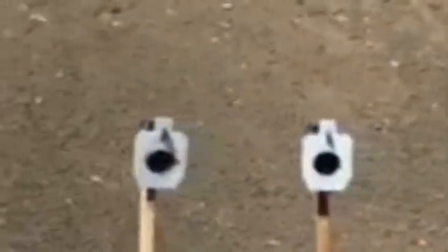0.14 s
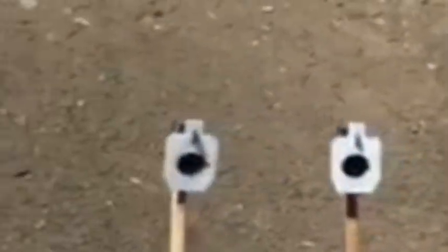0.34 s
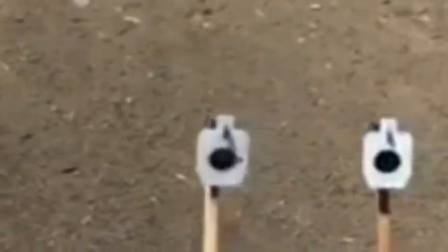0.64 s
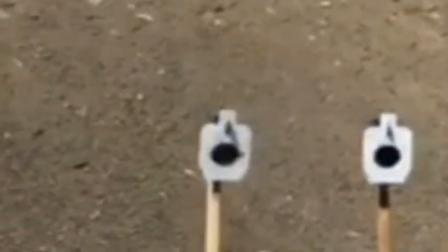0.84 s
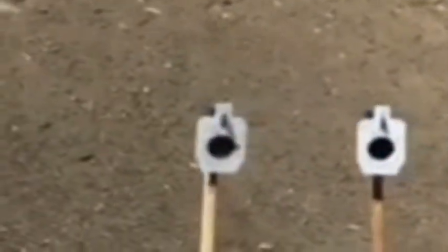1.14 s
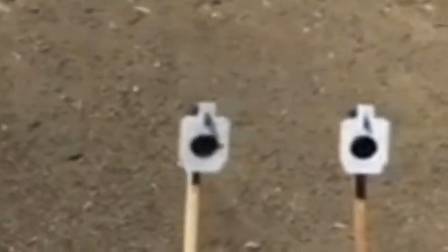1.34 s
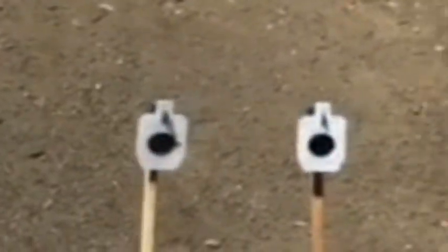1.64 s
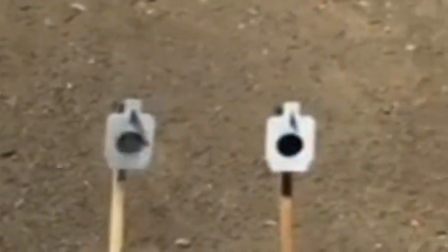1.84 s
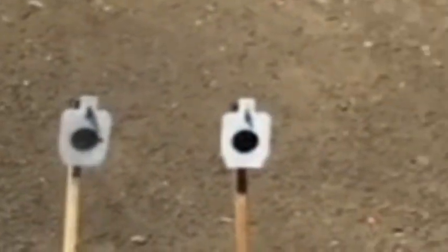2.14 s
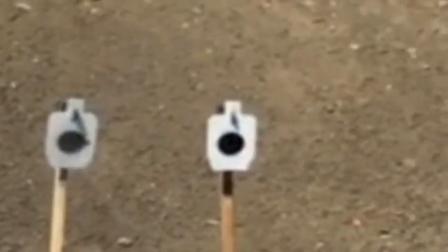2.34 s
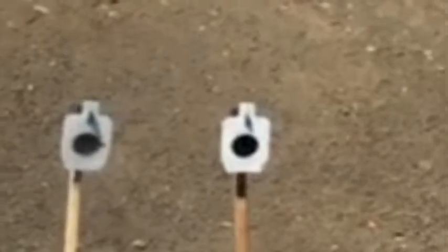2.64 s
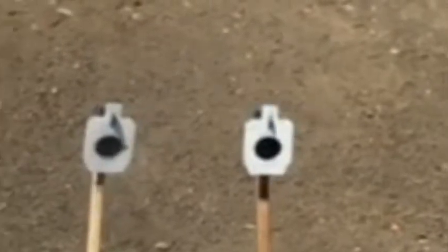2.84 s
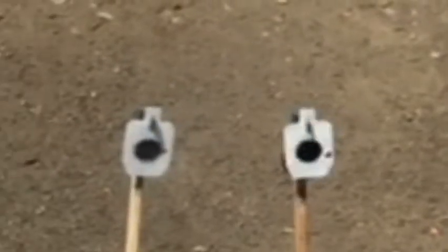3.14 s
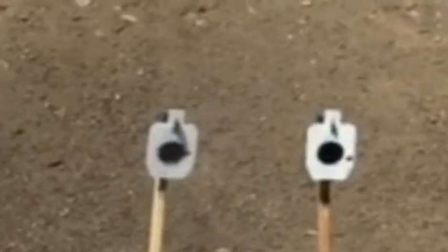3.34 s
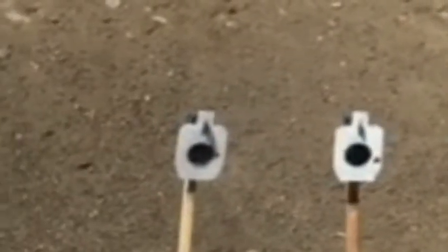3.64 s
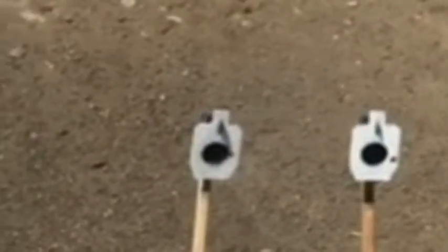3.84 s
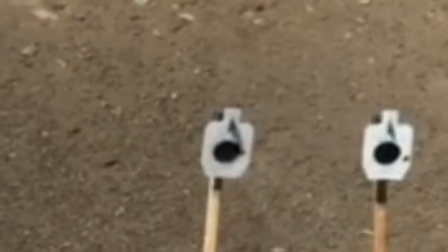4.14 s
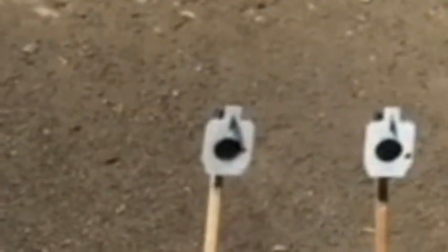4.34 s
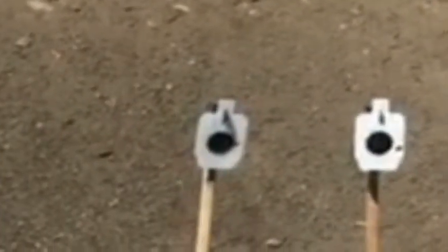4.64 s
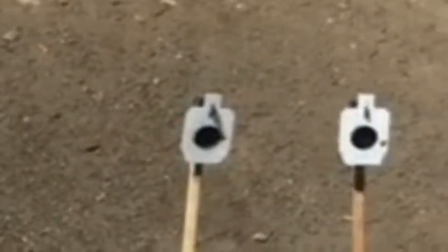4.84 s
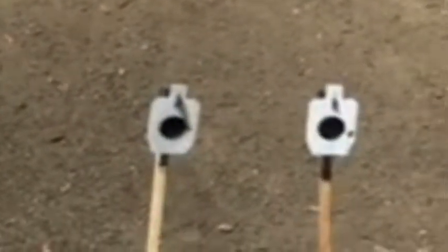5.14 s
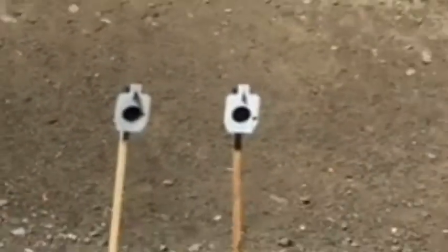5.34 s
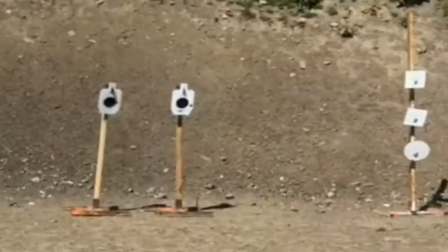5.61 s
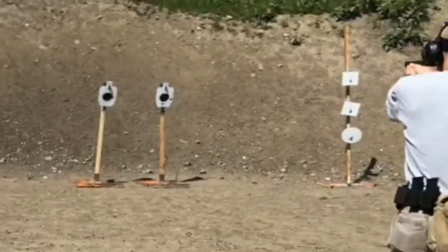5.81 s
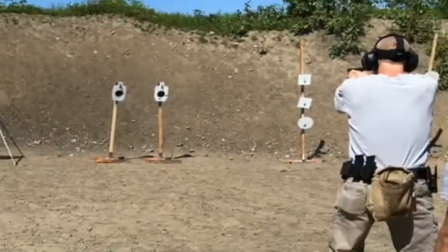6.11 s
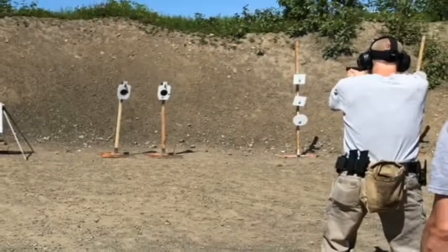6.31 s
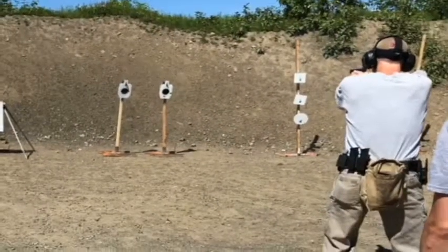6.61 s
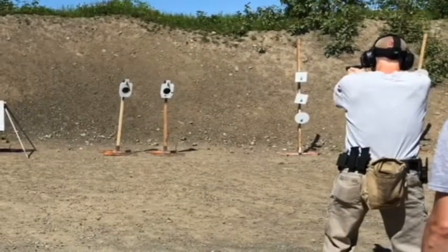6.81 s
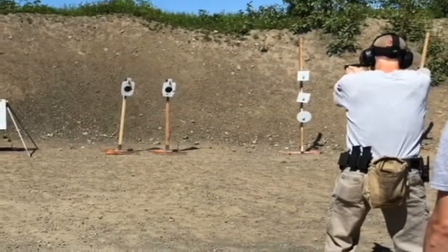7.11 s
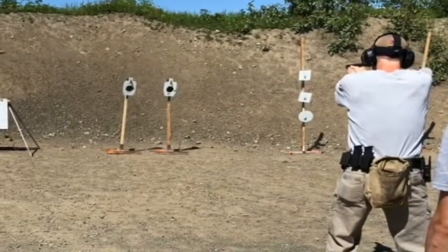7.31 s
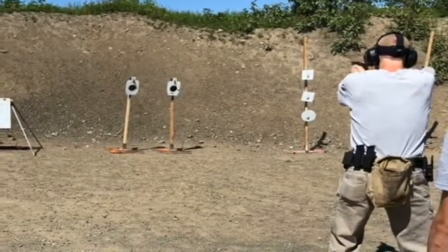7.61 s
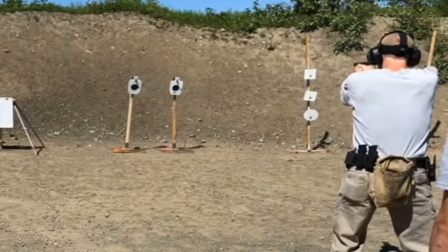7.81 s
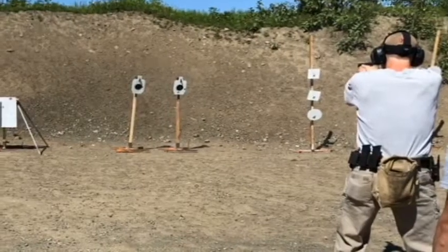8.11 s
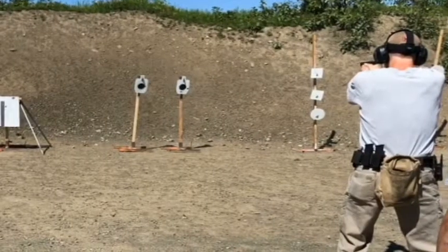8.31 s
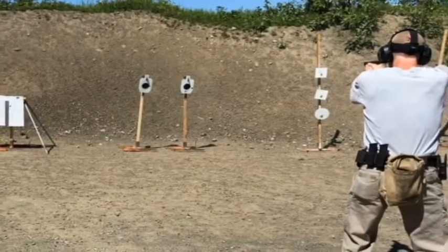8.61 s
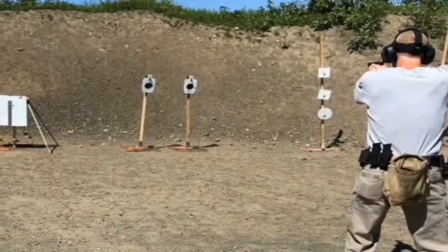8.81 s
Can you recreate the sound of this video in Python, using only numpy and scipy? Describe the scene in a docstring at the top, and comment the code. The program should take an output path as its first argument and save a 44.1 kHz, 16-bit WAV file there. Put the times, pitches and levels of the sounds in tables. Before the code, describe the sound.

Six spaced pistol shots, heard from just behind the shooter in an earth-walled outdoor bay. Each hard, clipped blast has a low boom and short echo, then a bullet smack and a bright steel ring swelling up as the microphone recovers. Feet crunch gravel, cases tinkle faintly, plates knock on their hangers, and a ricochet whirrs downward after the final shot.

```python
"""Pistol shots at steel plates

Six shots at two hanging plates in an earth-walled bay, heard from just behind the shooter. Each blast is shaped
noise plus a falling boom, bounced off the earth walls (berms), and it overloads the microphone. The bullet's
smack and the plate's ring, a sum of fading sines, come back about 50 ms later and swell as the limiter lets go.
Plates knock on their hangers, feet grind on gravel (lumpy noise), spent cases tinkle (pairs of high sines),
and after the last shot a fragment whirrs off as a falling tone with hiss, over quiet air and a faint hum."""
import sys
import numpy as np
from scipy import signal
from scipy.fft import rfft, irfft
from scipy.io import wavfile

SR = 44100
rng = np.random.default_rng(int(sys.argv[2]) if len(sys.argv) > 2 else 0)


def generate_wav(sig):
    """Save sig (samples, or channels by samples) to the path in sys.argv[1] as 16-bit PCM at SR."""
    pcm = np.round(np.clip(np.atleast_2d(sig).T, -1, 1) * 32767).astype(np.int16)
    wavfile.write(sys.argv[1], SR, pcm)


N = 395136
T = np.arange(N) / SR  # time in the scene, s
AGE = T[:49152]  # time since one sound began, s


def undb(db):
    """Turn decibels into a gain."""
    return 10 ** (np.asarray(db) / 20)


def add(out, t, x):
    """Mix x into out from time t (s) on."""
    i = int(round(max(t, 0) * SR))
    out[i:i + len(x)] += x[:max(N - i, 0)]


def noise(points, size=len(AGE)):
    """Noise of rms 1, its spectrum drawn through (f/Hz, relative level/dB) points."""
    hz, db = np.transpose(points)
    f = np.maximum(np.fft.rfftfreq(size, 1 / SR), 1)
    gain = undb(np.interp(np.log(f), np.log(hz), db)) * (f > hz[0] / 2)
    x = irfft(rfft(rng.standard_normal(size)) * gain, size)
    return x / x.std()


def fade(rise, t60):
    """A quick rise (s), then an exponential fall that loses 60 dB in t60 (s)."""
    return (1 - np.exp(-AGE / rise)) * np.exp(-np.log(1000) * AGE / t60)


def dull(x, hz):
    """Gently lose treble above hz."""
    return signal.sosfilt(signal.butter(1, min(hz, .45 * SR), fs=SR, output="sos"), x)


def grains(spread_db, step):
    """A gain of rms 1 that moves to a new random value every step seconds."""
    knots = np.arange(0, AGE[-1], step)
    jumps = np.clip(rng.standard_normal(len(knots)), -2, 2)
    gain = undb(spread_db * np.interp(AGE, knots, jumps))
    return gain / np.sqrt(np.mean(gain ** 2))


def lumpy(x, spread_db=4.0):
    """Make noise come in lumps, as when stones and clods throw it back."""
    return x * grains(spread_db, step=.004)


# The colour of the outdoor air: f/Hz, relative level/dB
AIR_COLOUR = [(15, -43), (25, -18), (92, -7), (236, -13), (270, -3.5), (301, -11), (911, -14),
              (1230, -15.5), (1480, -19.5), (1610, -18.5), (2840, -26), (16000, -38.5)]
# How loud the air is over time: t/s, level/dB
AIR_LEVEL = [(0, -70), (1.4, -64), (2.8, -71.5), (4, -70.5), (5.4, -69), (6.25, -73), (6.6, -72),
             (7.4, -66), (8.3, -72), (8.96, -67)]


def background(hum_hz=266.7, hum_db=-71):
    """Quiet outdoor air is shaped noise; a faint hum is a sine wavering in pitch and level."""
    air = undb(np.interp(T, *np.transpose(AIR_LEVEL))) * noise(AIR_COLOUR, size=N)
    knots = np.linspace(0, T[-1], num=30)
    waver = np.interp(T, knots, rng.standard_normal(len(knots)))  # used both as Hz and as dB
    hum = np.sin(2 * np.pi * np.cumsum(hum_hz + waver) / SR)
    return air + undb(hum_db + waver) * hum


def grit(hz):
    """Stones grinding together: noise that is strongest around hz."""
    return noise([(hz / 8, -16), (hz / 2, -4), (hz, 0), (hz * 2, -9),
                  (hz * 4, -18), (hz * 12, -36), (hz * 40, -60)])


# Feet shift on the gravel: t/s, length/s, level/dB, centre f/Hz
SHUFFLES = [(0, .29, -60.5, 1700), (.96, .24, -66, 1900), (1.25, .32, -61, 2110), (2.52, .18, -54.5, 1047),
            (5.27, .09, -58.5, 750), (6.666, .2, -61, 1250), (8.56, .39, -66.5, 1100)]


def shuffling(grain_db=4, grind_db=-11, slips_per_s=33, slip_t60=0.036, slip_spread_db=8):
    """A shifting sole grinds on, and stones slip under it at uneven intervals."""
    out = np.zeros(N)
    for t, length, db, hz in SHUFFLES:
        shape = np.zeros(N)
        add(shape, 0, undb(grind_db) * (AGE < length))
        for k, (late, size) in enumerate(rng.random((32, 2))):
            when = (k + late) / slips_per_s
            if when < length:
                add(shape, when, undb(slip_spread_db * size) * fade(.0002, slip_t60))
        shape = shape[:len(AGE)] * grains(grain_db, step=.002)
        shape /= np.sqrt(np.sum(shape ** 2) / (length * SR))  # even out the loudness
        add(out, t, undb(db) * grit(hz) * shape)
    return out


# The loudest crunches of gravel underfoot: t/s, level/dB, t60/s, centre f/Hz
SCUFFS = [(0.073, -53, 0.15, 1110), (.14, -49, 0.2, 1720), (0.942, -46.5, 0.22, 1100),
          (1.205, -47, 0.046, 2350), (1.222, -38.5, 0.066, 1890), (1.59, -41, 0.44, 2020),
          (1.603, -35.5, 0.12, 1900), (2.229, -58.5, 0.42, 288), (2.335, -55, 0.12, 1520),
          (3.827, -41.5, 0.033, 415), (6.397, -55.5, 0.042, 1090), (6.936, -58.5, .12, 1400)]


def gravel(grain_db=5, tick_db=1):
    """Short gritty crunches: one stone clicks along with a cluster of uneven grains."""
    out = np.zeros(N)
    for t, db, t60, hz in SCUFFS:
        cluster = grains(grain_db, step=.002) * fade(0.0011, t60)
        click = undb(tick_db) * fade(0.00049, 0.013)
        add(out, t, undb(db) * grit(hz) * (cluster + click))
    return out


# The colour of a hard hit: f/Hz, relative level/dB
SMACK_COLOUR = [(100, -16), (500, -1), (1400, 2.5), (3500, -2.5), (7000, -8.5), (16000, -13.5)]


def smack_noise():
    """Hard hits share this noise: bullet smack and spray, case clicks; so does the faint hiss before a shot."""
    return noise(SMACK_COLOUR)


# A spent case lands and tinkles: t/s, level/dB, f/Hz, length of its hop/s
CASES = [(0.0236, -52.5, 11470, .228), (1.218, -50, 11000, .18), (1.4783, -47.5, 10670, 0.14),
         (2.5531, -56, 11570, .1), (4.1934, -55, 11460, .1), (5.0683, -48.5, 11720, 0.11),
         (6.586, -57, 11450, 0.064), (8.4057, -56.5, 11700, .11)]


def brass(t60=0.7, split_hz=70, click_db=0, full_hop_s=0.14, hop_db=-8):
    """A case rings in a close pair of high modes, on landing and again after one hop."""
    out = np.zeros(N)
    for t, db, hz, hop in CASES:
        pair = np.sin(2 * np.pi * hz * AGE) + .5 * np.sin(2 * np.pi * (hz + split_hz) * AGE)
        ring = pair * (fade(0.00013, t60) / 2 + fade(0.0001, t60 / 10))
        click = undb(click_db) * smack_noise() * fade(0.000099, 0.02)
        tinkle = undb(db) * (ring + click) / 2
        add(out, t, tinkle)
        add(out, t + hop, undb(hop_db) * hop / full_hop_s * tinkle)  # shorter hops land softer
    return out


# A tumbling fragment flies off: t/s, spin f/Hz, whirr level/dB, hiss level/dB
RICOCHET = [(7.85, 632, -90, -68), (7.905, 504, -74, -41), (7.93, 368.5, -33.5, -43),
            (7.957, 256, -31, -50), (7.981, 160, -48.5, -46.5), (8.03, 87.4, -53, -53),
            (8.12, 58.4, -82, -76)]


def ricochet(second_db=-17, echo_s=.07, echo_db=-20, flutter_db=3, flutter_s=0.014):
    """The spin sets a falling, fluttering whirr with hiss; a berm echoes the whirr."""
    s, spin_hz, whirr_db, hiss_db = np.transpose(RICOCHET)
    phase = 2 * np.pi * np.cumsum(np.interp(T, s, spin_hz)) / SR
    flying = (T > s[0]) & (T < s[-1])
    flutter = np.interp(T - s[0], AGE, grains(flutter_db, flutter_s))
    tone = np.sin(phase) + undb(second_db) * np.sin(2 * phase)
    whirr = flying * flutter * undb(np.interp(T, s, whirr_db)) * tone
    rush = noise([(200, -11), (700, 4.0), (2000, 0), (7000, -1.0), (15000, -8.0)], size=N)
    out = whirr + flying * undb(np.interp(T, s, hiss_db)) * rush
    add(out, echo_s, undb(echo_db) * whirr)
    return out


def partials(hz, db, t60, swing_s=0.98, lobes=2.2, depth=0.66, rub_s=0.9):
    """Modes of a swinging plate: their lobes sweep past the microphone, so each blooms and dips."""
    hz, db, t60 = (np.float32(v)[:, None] for v in (hz, db, t60))
    start, turn = np.float32(2 * np.pi * rng.random((len(hz), 2))).T[:, :, None]
    age = np.float32(AGE)
    slow = age[::64]  # the slow changes need only one value per 64 samples
    swing = np.sin(2 * np.pi * slow / swing_s)
    beam = 1 + depth * np.cos(lobes * np.sqrt(hz / 1000) * swing + turn)
    early = slow < swing_s / 4
    beam /= np.sqrt(np.mean(beam[:, early] ** 2, axis=1, keepdims=True))
    rubbing = np.exp(-(slow / rub_s) ** 2)  # the hanger damps the plate more as it settles
    size = np.float32(undb(db) * beam * rubbing * np.exp(-np.log(1000) * slow / t60))
    return np.sum(np.repeat(size, 64, axis=1) * np.sin(2 * np.pi * hz * age + start), axis=0)


def plate(modes, minor_db, minor_t60=0.48, count=30):
    """One ring for each point of impact: the strong modes over a crowd of weak ones."""
    hz, t60, *points = np.transpose(modes)
    minor_hz = 2000 + 13700 * (np.arange(count) + rng.random(count)) / count
    rings = []
    for db in points:
        weak_db = minor_db + 4 * rng.standard_normal(count)
        weak = partials(minor_hz, weak_db, np.full(count, minor_t60))
        rings.append(partials(hz, db, t60) + weak)
    return rings


# Modes of the left plate, struck by shots 1-2: f/Hz, t60/s, level/dB at each of two points of impact
LEFT_PLATE = [(1621, 0.6, -34, -40), (2805, 1.3, -29, -37), (3077, 0.56, -18, -17), (3470, 1.2, -51, -43),
              (3850, 0.7, -42, -34), (4284, 0.64, -17, -17), (4805, 0.75, -27, -28), (5884, 0.64, -18, -34),
              (6309, 0.85, -32, -36), (7199, 0.35, -20, -34), (8011, 0.45, -25, -40),
              (8352, 0.93, -15, -14), (8482, 0.49, -16, -27), (8583, 0.47, -12, -18),
              (8940, 0.52, -26, -32), (9296, 0.68, -28, -38), (10102, 0.6, -22, -34),
              (10401, 0.7, -36, -30), (11282, 0.56, -32, -29), (11901, 0.48, -33, -33),
              (13719, 0.51, -14, -26), (13757, 0.8, -27, -31), (14853, 0.64, -30, -39)]
# Modes of the right plate, struck by shots 3-6: f/Hz, t60/s, level/dB at each of four points of impact
RIGHT_PLATE = [(1061, 0.95, -39, -44, -43, -43), (1480, 0.8, -31, -34, -21, -27),
               (1505, 0.65, -20, -19, -23, -20), (1597, 0.83, -44, -48, -23, -39),
               (1845, 0.73, -29, -44, -30, -37), (2035, 0.51, -32, -21, -24, -23),
               (2318, 0.85, -22, -39, -25, -43), (2657, 0.8, -38, -47, -27, -39),
               (2922, 0.64, -30, -35, -23, -22), (3254, 0.56, -38, -33, -16, -29),
               (3607, 0.67, -26, -29, -27, -40), (3811, 0.59, -34, -22, -28, -16),
               (3969, 0.74, -24, -20, -41, -21), (4515, 0.66, -38, -47, -18, -34),
               (4704, 0.57, -26, -20, -26, -14), (5138, 0.5, -13, -38, -28, -30),
               (5948, 0.66, -37, -50, -19, -29), (6267, 0.63, -28, -18, -36, -33),
               (6362, 0.57, -23, -19, -31, -19), (6632, 0.38, -30, -17, -22, -26),
               (6703, 0.68, -29, -10, -44, -26), (6774, 0.51, -32, -36, -27, -21),
               (7257, 0.79, -32, -19, -34, -24), (7568, 0.45, -37, -38, -16, -43),
               (8015, 0.56, -24, -50, -26, -35), (8411, 0.48, -37, -37, -20, -39),
               (8682, 0.65, -28, -29, -34, -30), (9502, 0.6, -25, -21, -36, -15),
               (9588, 0.62, -25, -13, -36, -11), (9879, 0.45, -13, -37, -28, -38),
               (10222, 0.38, -19, -50, -17, -15), (10615, 0.9, -37, -32, -31, -22),
               (10654, 0.39, -25, -37, -11, -27), (10738, 0.53, -29, -21, -29, -23),
               (11169, 0.52, -50, -50, -15, -34), (11271, 0.54, -30, -50, -17, -31),
               (12851, 0.44, -37, -23, -39, -23), (13041, 0.75, -33, -40, -28, -43),
               (13561, 0.32, -32, -43, -21, -20), (13662, 0.5, -34, -45, -23, -42),
               (14530, 0.44, -40, -16, -34, -34), (14560, 0.66, -43, -24, -35, -28),
               (15090, 0.51, -34, -31, -37, -27), (15453, 0.53, -39, -41, -22, -27),
               (15562, 0.5, -17, -43, -25, -30)]


def plate_rings():
    """Six rings, one per shot: where the bullet lands decides how strongly each mode sounds."""
    return plate(LEFT_PLATE, minor_db=-38) + plate(RIGHT_PLATE, minor_db=-29)


def wake(tone, low_hz=1600, high_hz=3300):
    """A soft knock wakes mostly the plate's middle modes."""
    band = signal.butter(1, [low_hz, high_hz], "band", fs=SR, output="sos")
    return signal.sosfilt(band, dull(tone, high_hz))


# A swinging plate knocks on its hanger: t/s, clatter level/dB, ring level/dB
KNOCKS = [(0.736, -44, -24), (2.088, -47.5, -30.5), (3.125, -28, -14.5), (3.488, -48, -40.5),
          (4.664, -40.5, -26.5), (5.128, -54.5, -41), (5.746, -34.5, -15.5), (6.028, -45.5, -41.5),
          (6.123, -51, -55), (7.688, -29, -16)]
# The colour of the hanger's clatter: f/Hz, relative level/dB
HANGER_COLOUR = [(200, -43), (600, -16), (900, 8), (1200, 8), (1550, 9), (2200, 0.5), (4000, -3),
                 (8000, -16), (16000, -11)]


def hanger_knocks(rings, knock_t60=0.216, wake_db=2):
    """Each knock is a lumpy clatter that softly rings the plate hit last; returns clatter and ringing."""
    clatter, steel = np.zeros(N), np.zeros(N)
    for t, db, ring_db in KNOCKS:
        last = sum(shot[0] < t for shot in SHOTS) - 1
        add(clatter, t, undb(db) * lumpy(noise(HANGER_COLOUR)) * fade(0.00041, knock_t60))
        add(steel, t, undb(ring_db + wake_db) * wake(rings[last]))
    return clatter, steel


# The colour of sound scattered by the ground and the bay: f/Hz, relative level/dB
SCATTER_COLOUR = [(50, -10), (250, -8), (800, -1), (2000, -8.5), (4000, -1.5), (8000, -8), (16000, -20.5)]


def scatter_noise():
    """Noise for sound thrown back from many places at once."""
    return noise(SCATTER_COLOUR)


def bay_echo(steel, echo_db=-13, echo_t60=0.15):
    """The bay smears the steel's sound into a short dense echo."""
    bay = scatter_noise() * fade(0.042, echo_t60)
    bay /= np.sqrt(np.sum(bay ** 2))
    return undb(echo_db) * signal.fftconvolve(steel, bay)[:N]


def lead_in(db=-16, t60=0.036, hiss_db=-38, hiss_t60=0.26):
    """A faint flat hiss under a dull swell (a fading noise reversed) that runs into the crack; 22 ms long."""
    size = int(.022 * SR)
    swell = noise([(100, -10.5), (450, 0.5), (800, -7.0), (1500, -18.5),
                   (3100, -19.5), (5000, -30.5), (16000, -64)])
    swell = (swell * fade(.0001, t60))[:size][::-1]
    hiss = (smack_noise() * fade(0.0001, hiss_t60))[:size]
    return undb(db) * swell + undb(hiss_db) * hiss


# Paths of the blast, direct and off ground and berms: delay/s, level/dB, rise/s, t60/s, treble corner f/Hz
PATHS = [(0, 8.5, .0002, .026, 14080), (.0034, 9.5, 0.00047, .02, 7880), (.023, 5, 0.0046, .04, 1200),
         (0.0291, 6, .001, .028, 2500), (.084, -15.5, .003, .06, 2500)]
# The colour of the blast: f/Hz, relative level/dB
BLAST_COLOUR = [(40, -12.5), (200, -5.5), (520, 4.5), (900, 2), (1800, -8.5), (3200, 1), (6000, -7),
                (11000, -7), (16000, -18.5)]
# The colour of the blast's far tail: f/Hz, relative level/dB
FAR_TAIL_COLOUR = [(40, -18.5), (120, -4), (260, -5), (500, -11.5), (1400, 0.5), (3500, 0), (7000, -9),
                   (16000, -24)]


def blast(berm_db, boom_db, boom_hz=54, glide_hz=60, return_db=-7,
          scatter_db=-11, scatter_t60=0.37, tail_db=-28, tail_t60=.7):
    """Muzzle blast: a few hard arrivals, a falling low boom, scatter from the gravel and a far tail."""
    out = np.zeros(N)
    for delay, db, rise, t60, corner_hz in PATHS:
        off_berm = delay > .01  # only the late paths take the berm's level
        arrival = dull(noise(BLAST_COLOUR), corner_hz) * fade(rise, t60)
        add(out, delay, undb(db + off_berm * berm_db) * arrival)
    phase = 2 * np.pi * np.cumsum(boom_hz + glide_hz * np.exp(-AGE / 0.012)) / SR
    boom = np.sin(phase) * fade(.025, 0.051)
    add(out, .008, undb(boom_db) * boom)
    add(out, .058, undb(return_db + boom_db) * boom)  # back from the end berm
    add(out, .004, undb(scatter_db) * lumpy(scatter_noise()) * fade(.006, scatter_t60))
    far_tail = lumpy(noise(FAR_TAIL_COLOUR), spread_db=3.5)
    add(out, .04, undb(tail_db) * far_tail * fade(0.031, tail_t60))
    return out[:len(AGE)]


# The shots: t/s, then level/dB of blast, berm echo, boom, smack and ring
SHOTS = [(0.3208, -2.5, -2.5, 9.5, -6.5, -0.5), (1.6729, -3, 2.5, 12, -6, -0.5), (2.9364, 0, 3, 9, -1, 1),
         (4.2835, -0.5, 1, 10.5, 1, 1.5), (5.524, 2, -2.5, 5, -2.5, 2), (7.535, 3.5, 0, 3.5, 1.5, 0.5)]


def shots(rings, round_trip_s=.0494, smack_db=5, smack_t60=0.013, spray_db=-23, spray_t60=0.33,
          bloom_s=0.051, bloom_share=0.6):
    """Blast, then the bullet's smack and spray and the plate's ring; returns shots and ringing."""
    out, steel = np.zeros(N), np.zeros(N)
    bloom = 1 - bloom_share * np.exp(-AGE / bloom_s)  # the ring builds up as the plate tips back
    for (t, db, berm_db, boom_db, hit_db, ring_db), ring in zip(SHOTS, rings):
        hit = t + round_trip_s  # the bullet flies out and its sound comes back
        lead = lead_in()
        add(out, t - len(lead) / SR, lead)
        add(out, t, undb(db) * blast(berm_db, boom_db))
        add(out, hit, undb(smack_db + hit_db) * smack_noise() * fade(0.00043, smack_t60))
        add(out, hit, undb(spray_db) * lumpy(smack_noise()) * fade(0.0017, spray_t60))
        add(steel, hit, undb(ring_db) * ring * bloom)
    return out, steel


def range_fire():
    """Shots and hanger knocks share the same plates, and the bay echoes all the ringing steel."""
    rings = plate_rings()
    fire, struck = shots(rings)
    clatter, knocked = hanger_knocks(rings)
    steel = struck + knocked
    return fire + clatter + steel + bay_echo(steel)


def scene():
    """The whole bay at one microphone."""
    return (background() + shuffling() + gravel() + brass() + ricochet() + range_fire())[None]


def record(dry, overload_db=18, ceiling_db=-1, release_db_per_s=135, top_hz=15800):
    """The microphone saturates; a limiter ducks at once and recovers steadily; the top is cut."""
    x = undb(overload_db) * np.tanh(dry / undb(overload_db))
    over = np.maximum(20 * np.log10(np.abs(x) + 1e-9) - ceiling_db, 0)
    recovery = release_db_per_s * T
    duck = np.maximum.accumulate(over + recovery, axis=-1) - recovery  # dB turned down
    top_cut = signal.ellip(8, .2, 70, top_hz, fs=SR, output="sos")
    return signal.sosfilt(top_cut, x * undb(-duck))


dry = scene()
out = record(dry)
generate_wav(out)
```